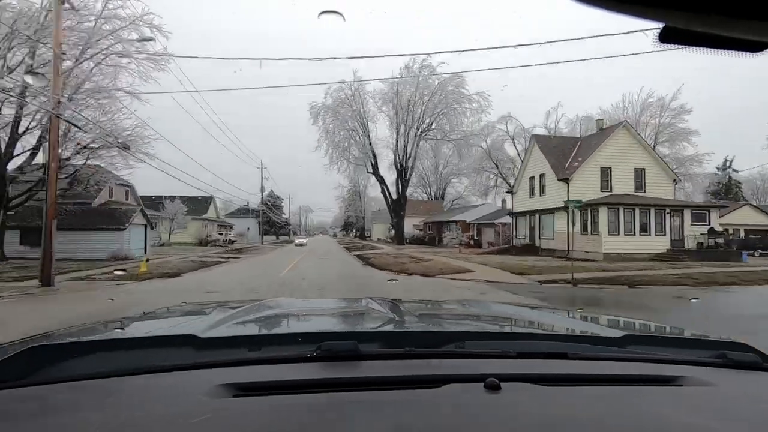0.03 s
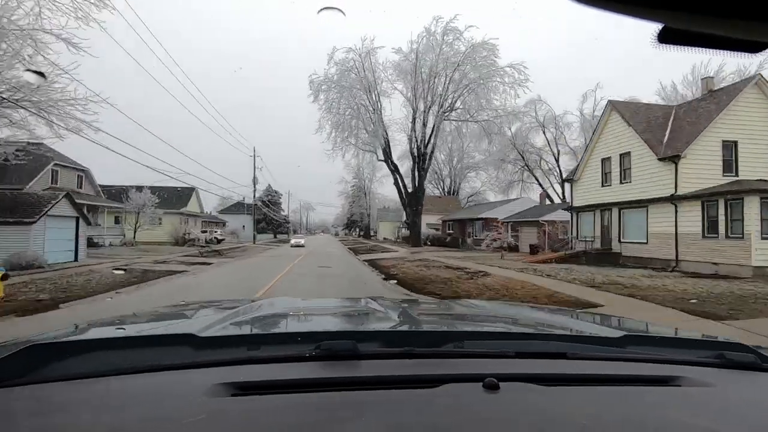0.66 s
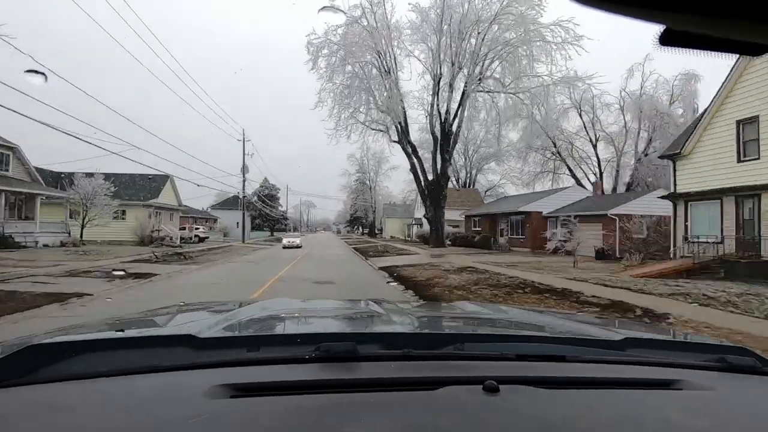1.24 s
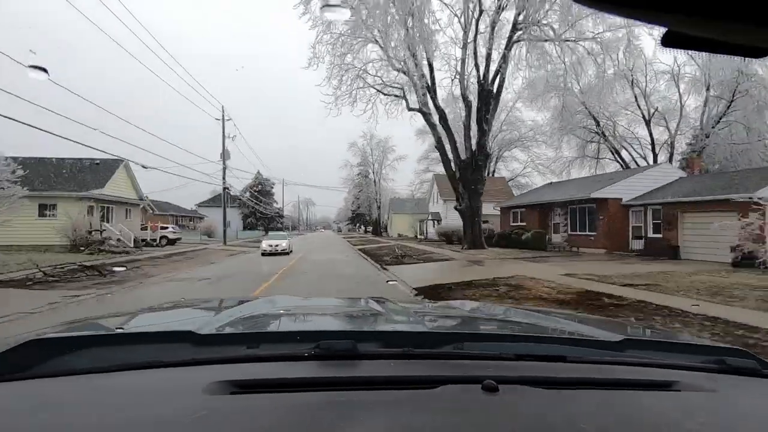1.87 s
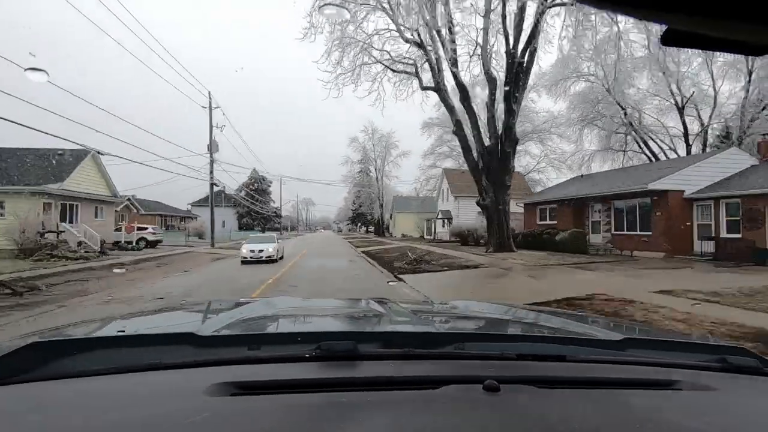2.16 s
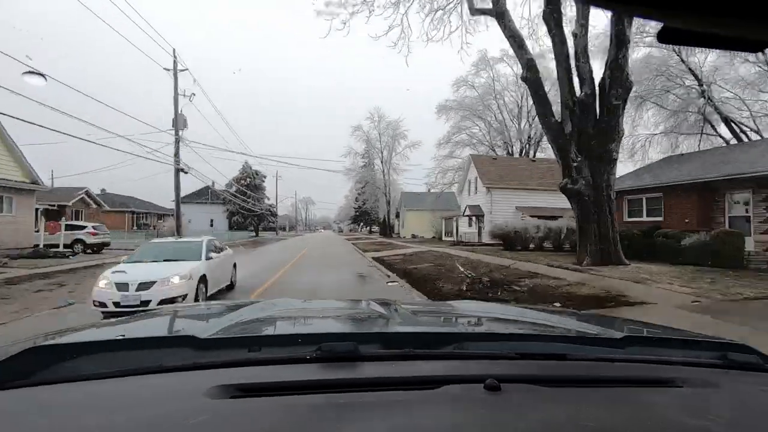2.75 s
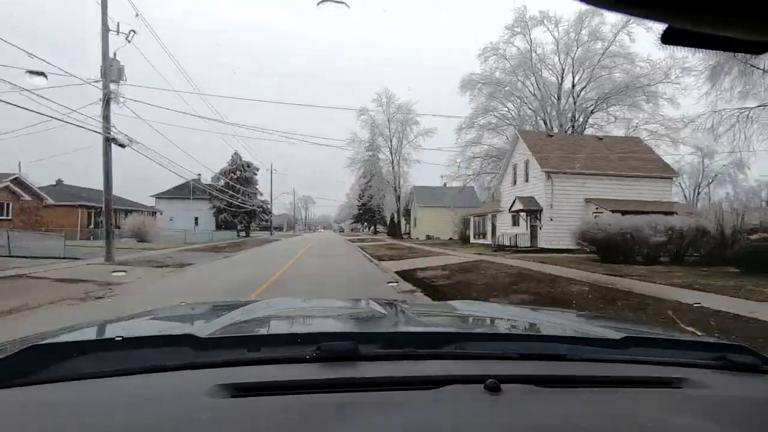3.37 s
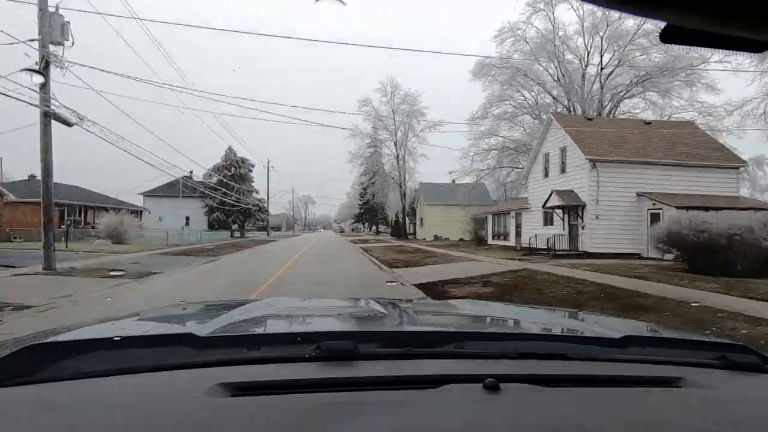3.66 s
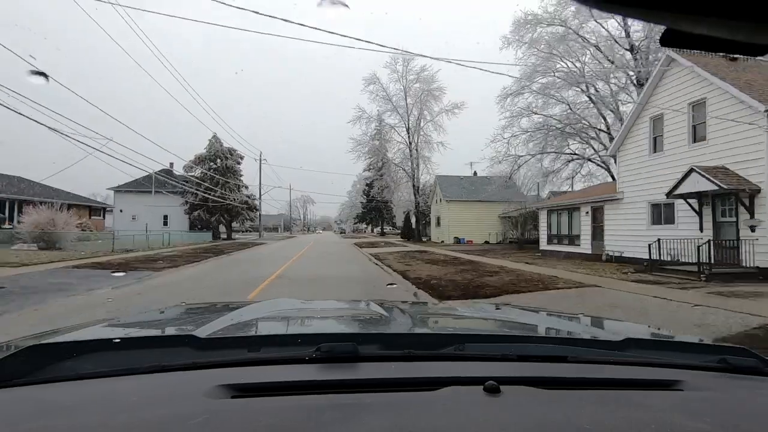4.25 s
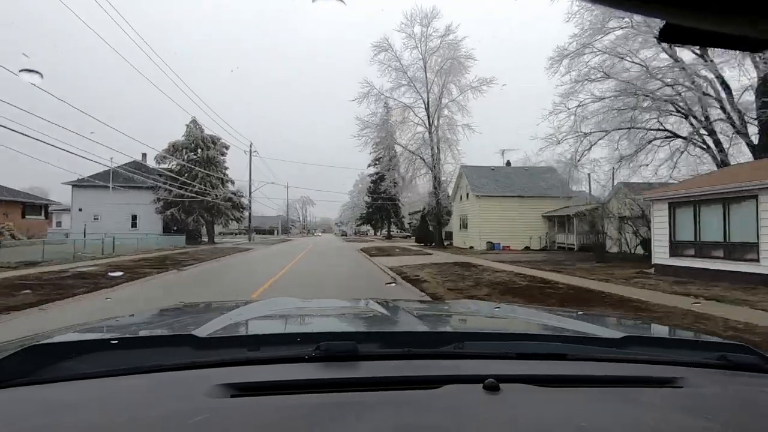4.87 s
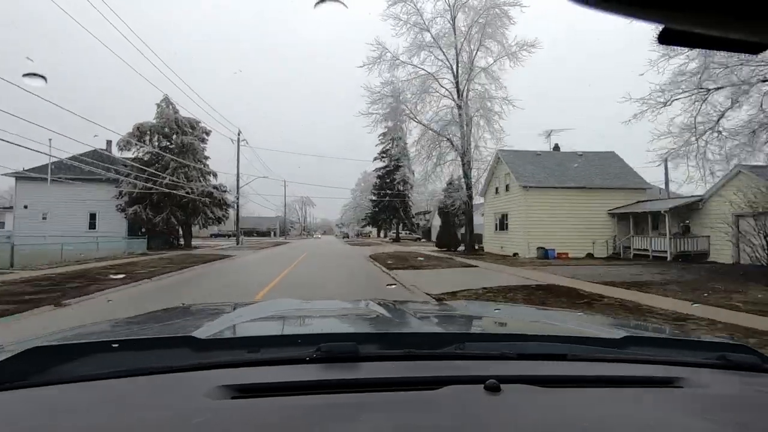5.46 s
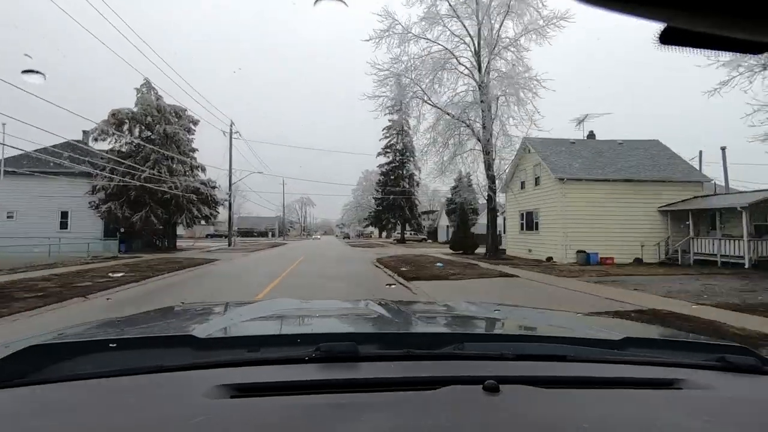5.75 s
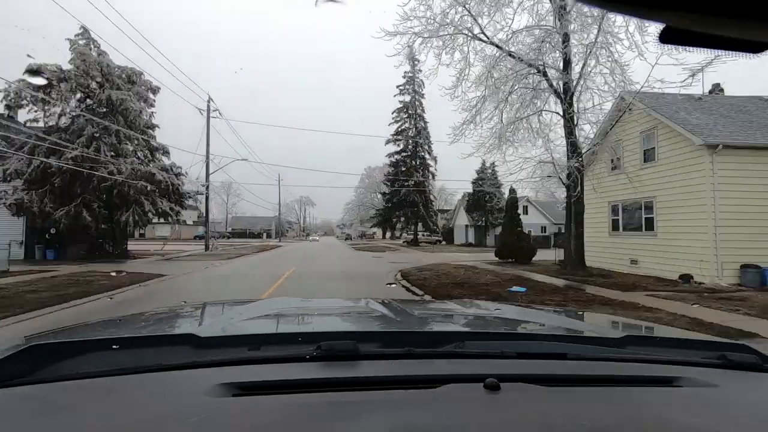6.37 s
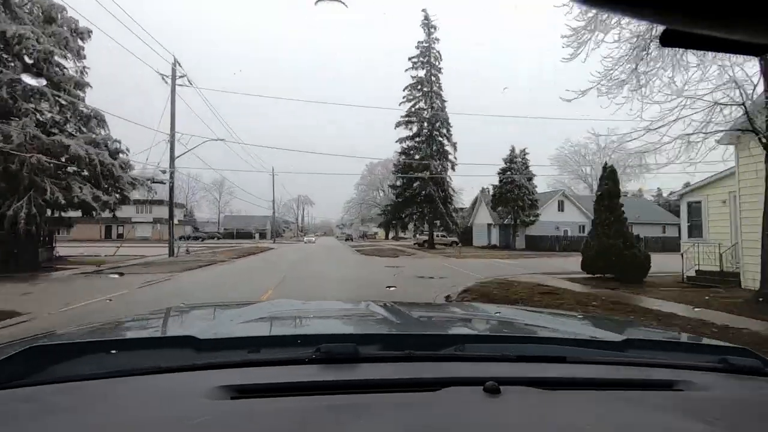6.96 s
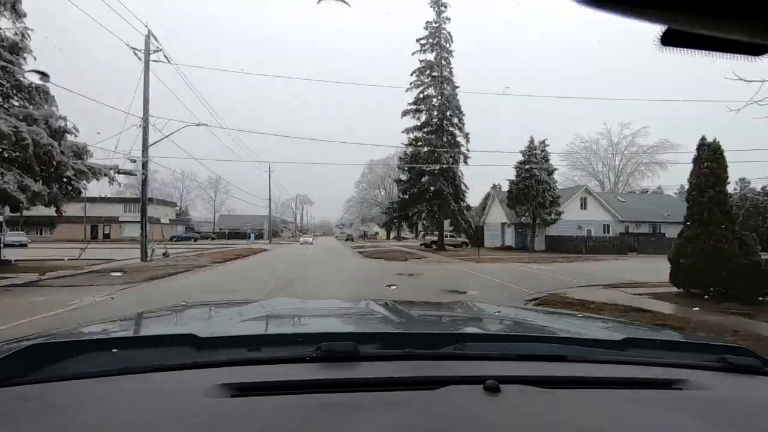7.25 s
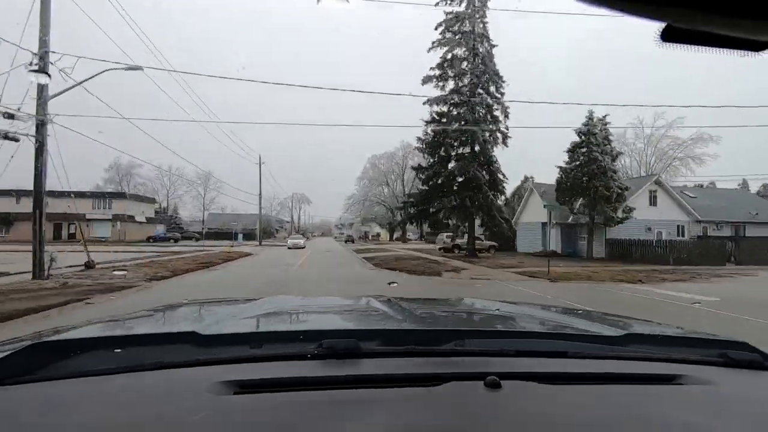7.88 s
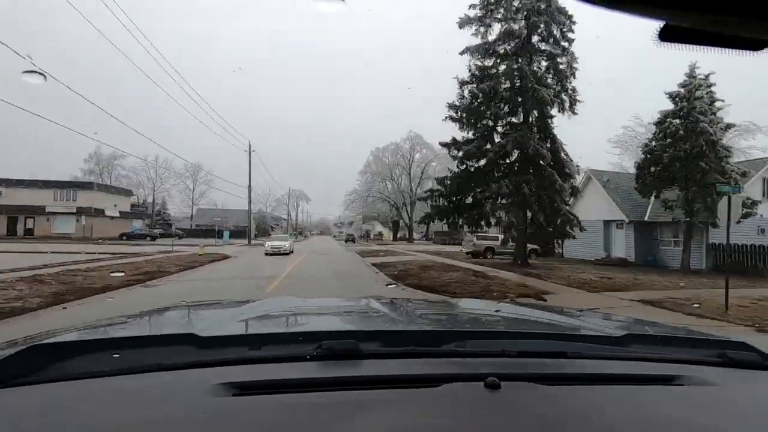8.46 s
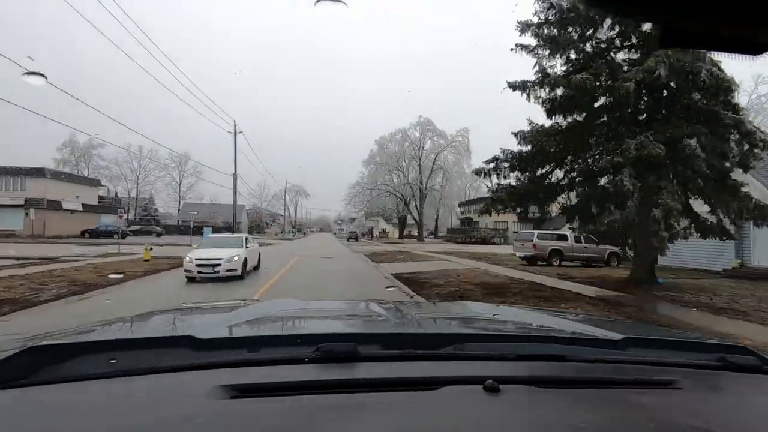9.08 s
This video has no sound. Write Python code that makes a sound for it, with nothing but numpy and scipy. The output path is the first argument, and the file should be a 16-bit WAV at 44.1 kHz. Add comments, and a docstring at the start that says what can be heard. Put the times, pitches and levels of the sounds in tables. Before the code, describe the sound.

Heard from behind the dashboard, a car rolls along a wet, uneven street. Deep booms from frequent bumps swell over steady tyre roar and a faint engine hum. Loose trim buzzes, knocks and ticks in short bursts. Three fat water drops smack the windscreen early on, something hard clatters briefly near the middle, and a few more drops land later, around the heaviest bump and its run of rattles.

```python
"""Inside a car rolling along a wet, uneven street after an ice storm.
Bumps set the cabin air booming and drum the floor pan, over tyre roar and a low engine hum.
Loose trim buzzes and knocks, a camera mount knocks in its play, small fittings tick, a plastic
joint squeaks and something hard clatters briefly. Fat drops of meltwater smack the windscreen
and excite the bending modes of the glass."""
import sys
import numpy as np
from scipy import signal
from scipy.fft import rfft, irfft
from scipy.io import wavfile
from scipy.ndimage import uniform_filter1d, minimum_filter1d

SR = 44100
rng = np.random.default_rng(int(sys.argv[2]) if len(sys.argv) > 2 else 0)


def wav_record(signal):
    """Record a signal, one row per channel, as 16-bit PCM in the file named by sys.argv[1]."""
    frames = np.transpose(np.atleast_2d(signal))
    bounded = np.clip(frames, -1, 1)
    # unit amplitude maps onto the largest positive 16-bit level
    quanta = np.round(bounded * 32767).astype(np.int16)
    wavfile.write(sys.argv[1], SR, quanta)


N = 402191
TIME = np.arange(N) / SR
IMPACT_TIME = np.arange(8192) / SR


def gain_of(db):
    """Amplitude ratio of a level; the levels in all tables are relative."""
    return 10 ** (np.asarray(db) / 20)


def unit_rms(x):
    """Normalisation to unit mean power."""
    return x / np.sqrt(np.mean(x ** 2) + 1e-20)


def at_frequency(points, hz):
    """Interpolation on a logarithmic frequency axis."""
    f, value = np.transpose(points)
    return np.interp(np.log(hz + 1), np.log(f + 1), value)


def curves(rows):
    """Linear interpolation in time of each column of a table."""
    times, *columns = np.transpose(rows)
    return [np.interp(TIME, times, column) for column in columns]


def add(mix, start_s, sound):
    """Superposition of a stereo sound on the mix."""
    part = mix[:, max(round(start_s * SR), 0):][:, :sound.shape[-1]]
    part += sound[..., :part.shape[-1]]


def panned(lean_db):
    """Gains for a level difference of left over right."""
    return gain_of(np.array([[lean_db], [-lean_db]]) / 2)


def drift(hz):
    """Random fluctuation of rms 1, low-passed at hz."""
    f = np.fft.rfftfreq(N, 1 / SR)
    return unit_rms(irfft(rfft(rng.standard_normal(N)) / (1 + (f / hz) ** 4), N))


def minimum_phase(x, spectrum):
    """A minimum-phase filter imposes a spectrum and keeps the onset sharp."""
    size = len(IMPACT_TIME)
    log_gain = np.log(gain_of(at_frequency(spectrum, abs(np.fft.fftfreq(size, 1 / SR)))))
    response = np.exp(np.conj(signal.hilbert(log_gain)))[:size // 2 + 1]
    return irfft(rfft(x) * response, size)


def impact(spectrum, t60, crack, cabin_db, cabin_t60, coherence):
    """Impulse response: a crack, dense decaying modes and cabin reverberation; rms 1 over 4 ms."""
    t = IMPACT_TIME
    shared, *separate = rng.standard_normal((3, len(t)))
    ring = np.sqrt(coherence) * shared + np.sqrt(1 - coherence) * np.array(separate)
    ring *= gain_of(-60 * t / t60) + gain_of(cabin_db - 60 * t / cabin_t60)
    sound = minimum_phase(ring + crack * (t == 0), spectrum)
    return sound / np.sqrt(np.mean(sound[:, t < .004] ** 2))


def ringing(modes, scatter_db, detune=.01):
    """Free vibration as a sum of damped modes, whose weights vary with the point struck."""
    t, sides = IMPACT_TIME, np.array([[.5], [-.5]])
    out = np.zeros((2, len(t)))
    for hz, db, t60, lead in modes:
        decay = gain_of(db + scatter_db * rng.standard_normal() - 60 * t / t60)
        mode_hz = hz * (1 + detune * rng.uniform(-1, 1))
        out += decay * np.sin(2 * np.pi * mode_hz * t + lead * sides)
    return out


# Likeness of left and right in the cabin: f/Hz, correlation
FIELD_CORRELATION = [(30, .9), (65, .97), (95, .7), (150, .72), (170, 0), (200, .82), (245, .8), (285, .55),
                     (330, .75), (480, .72), (530, .45), (760, .35), (805, -.4), (870, .45), (1120, -.15),
                     (1400, 0), (2200, .4), (9000, .3)]
# Balance of the road noise: f/Hz, left over right/dB
FIELD_BALANCE = [(80, 0), (120, -5), (145, 0), (172, -4), (205, -1.5), (250, 1.8), (300, 2), (350, -1.2),
                 (430, 0.5), (630, 0), (940, -1), (1390, -1), (2060, -1), (3050, -0.5), (4520, -3.5),
                 (6690, -2.5), (9910, -0.5)]

def cabin_noise(spectrum, patchy_db, size=2048):
    """A partly coherent noise field of rms 1, nearly mono in the bass, with drifting spectral patches."""
    hz, hop = np.fft.rfftfreq(size, 1 / SR), size // 4
    a, b, c, d, patches = rng.standard_normal((5, len(hz), N // hop + 5))
    patches = uniform_filter1d(patches, size=14, axis=0)
    patches = unit_rms(uniform_filter1d(patches, size=6, axis=1))
    correlation = at_frequency(FIELD_CORRELATION, hz)[:, None]
    left = a + 1j * b
    right = correlation * left + np.sqrt(1 - correlation ** 2) * (c + 1j * d)
    field = np.array([left, right]) * gain_of(at_frequency(spectrum, hz)[:, None] + patchy_db * patches)
    field *= gain_of(np.outer([.5, -.5], at_frequency(FIELD_BALANCE, hz)))[..., None]
    _, sound = signal.istft(field, nperseg=size, noverlap=size - hop)
    return unit_rms(sound[:, :N])


# Engine under light load: t/s, firing rate f/Hz, level/dB
ENGINE_RUN = [(0, 72.56, 1.5), (1.2, 73.7, 2.5), (1.65, 80.14, -3.5), (2.1, 75.45, 8), (4.5, 76.1, -8),
              (6.5, 73.57, 1.5), (7.6, 78, 0.5), (8.3, 74, -2), (9.12, 72.6, 0)]
# Orders of the hum: multiple of the firing rate, level/dB
HUM_ORDERS = [(1, -42), (2, -53.5), (2.5, -56)]

def engine(waver_db=4.0, rough_db=3.5, rough_hz=18):
    """Periodic firing gives a few orders; uneven firing modulates their amplitude and phase."""
    firing_hz, hum_db = curves(ENGINE_RUN)
    cycles = np.cumsum(firing_hz * (1 + 0.0049 * drift(hz=2.7))) / SR
    hum = np.zeros(N)
    for order, db in HUM_ORDERS:
        amplitude = gain_of(db + hum_db + waver_db * drift(hz=1.0) + rough_db * drift(rough_hz))
        hum += amplitude * np.sin(2 * np.pi * order * cycles + .25 * order * drift(rough_hz))
    return np.sqrt(2) * hum


# Road texture between bumps: t/s, rumble level/dB, roar level/dB, spray level/dB
ROAD_TEXTURE = [(.35, -39, -48, -69), (.9, -34.5, -45, -67.5), (1.65, -33.5, -45, -65.5),
                (2.5, -35, -45, -65.5), (3.05, -35, -45, -62.5), (3.65, -32.5, -46, -64),
                (3.9, -31.5, -46.5, -60), (4.25, -28.5, -44.5, -58.5), (4.42, -29, -48, -66),
                (5.0, -33.5, -48.5, -70), (5.8, -35, -48, -69), (6.8, -34, -46, -68.5),
                (7.45, -35.5, -48, -69), (7.8, -32, -48, -61.5), (8.3, -37.5, -50, -72),
                (8.65, -35, -47, -69), (9.12, -29, -45, -61)]
# Spectra of rumble, tread roar and spray: f/Hz, level/dB
RUMBLE_SPECTRUM = [(42, -24), (54, -2.5), (66, -6.5), (82, -11.5), (100, -6), (135, -10), (185, -14.5),
                   (240, -29), (400, -32), (900, -85)]
ROAR_SPECTRUM = [(120, -19), (230, 5), (285, 4.5), (330, -3), (368, 1.5), (405, -3.5), (500, -5.5),
                 (558, -5), (590, -8), (665, -2.5), (712, -6.5), (775, -4.5), (870, -7), (975, -11.5),
                 (1170, -14.5), (1360, -11.5), (1480, -18), (1620, -16.5), (1750, -20), (2300, -37),
                 (4000, -87)]
SPRAY_SPECTRUM = [(700, -15), (1500, -0.5), (2300, 2.5), (3200, -5.5), (4200, -14.5), (5500, -20.5),
                  (8200, -21), (10000, -35.5), (15000, -45.5)]

def tyres(rumble_db, roar_db):
    """Three transmission paths: rumble through the suspension, roar the floor, spray the glass."""
    *_, spray_db = curves(ROAD_TEXTURE)
    rumble = cabin_noise(RUMBLE_SPECTRUM, patchy_db=-0.5, size=4096) * gain_of(rumble_db - 0.5)
    roar = cabin_noise(ROAR_SPECTRUM, patchy_db=0.6) * gain_of(roar_db + 2)
    spray = cabin_noise(SPRAY_SPECTRUM, patchy_db=1.0) * gain_of(spray_db)
    return rumble + roar + spray


def dashboard(rumble_db, level_db=-62, rough_road_db=-24, exponent=1.24):
    """Forced vibration: fine chatter grows as a power of the rumble, saturating on rough road."""
    drive_db = exponent * np.minimum(rumble_db - rough_road_db, 0)
    spectrum = [(800, -26.0), (1400, -6.5), (2300, 0.0), (3400, -3.5),  # f/Hz, level/dB
                (4300, -11.5), (6000, -13.0), (8300, -13.5), (10000, -28.0)]
    return cabin_noise(spectrum, patchy_db=3.0, size=256) * gain_of(level_db + drive_db)


# Contact spectrum of a fitting: f/Hz, level/dB
TICK_SPECTRUM = [(800, -15.5), (1400, 3), (2400, -5.5), (3600, -8), (4500, 1), (5400, -9.5), (7000, -7.5),
                 (8300, -7.5), (9500, -10.5), (10800, -32)]
# Modes of the fittings: f/Hz, level/dB, T60/s, left phase lead/rad
FITTING_MODES = [(1280, -6.5, .02, 2), (3100, -9, .012, .3), (4400, -10, .009, .5), (4950, -3, 0.012, .5),
                 (7050, -8, .011, 1.5), (8070, 1.5, .012, 1.5)]

def tick(note_hz, note_db, note_t60=.019, rise_s=0.00094):
    """Contact between small hard parts excites their common modes and one note of their own."""
    touch = impact(TICK_SPECTRUM, t60=0.011, crack=0.92, cabin_db=-26, cabin_t60=.1, coherence=0.11)
    note = ringing([(note_hz, note_db, note_t60, 0)], scatter_db=0)
    ring = ringing(FITTING_MODES, scatter_db=2, detune=0.036)
    onset = 1 - np.exp(-IMPACT_TIME / rise_s)
    return (gain_of(-1) * touch + gain_of(-6) * ring + note) * onset * panned(lean_db=-6.5)


# Ticks of the fittings: t/s, level/dB, note f/Hz, note level/dB
FITTING_TICKS = [(0.0535, -52, 8150, -6), (0.2207, -46, 7550, -2), (0.3, -59.5, 4830, -9),
                 (0.6, -50, 7600, -2), (1.215, -49.5, 4470, -2), (1.79, -55, 7940, -7),
                 (2.083, -56, 7040, 6), (3.054, -58, 3120, 11.5), (3.5223, -57, 8200, 1),
                 (3.633, -54.5, 7000, -2), (4.263, -31, 4500, -2), (4.91, -63, 8200, -2),
                 (4.99, -59.5, 8200, -3), (5.29, -40, 3080, 1), (5.345, -51.5, 3170, 4),
                 (5.43, -41, 4530, -16), (7.033, -51, 8060, 3), (7.073, -52, 8000, 4),
                 (7.147, -59, 8060, 2), (7.185, -58, 8100, -2), (7.3, -60, 4870, -3),
                 (7.389, -57, 8140, -4), (7.805, -57, 8160, 6), (7.888, -45.5, 4400, -1),
                 (8.002, -34, 4550, -8)]
# Spectrum of a tiny hard contact: f/Hz, level/dB
FAINT_SPECTRUM = [(2000, -12.5), (4200, -15), (4950, 3), (5500, -20.5), (7200, -14.5), (8200, -2),
                  (9200, -14.5), (10500, -29.5)]

def fittings(rumble_db, tick_db=-1.5, faint_db=-70, spread_db=7, rough_road_db=-28):
    """Impact noise of small parts: distinct ticks, and faint random ones that weaken on smooth road."""
    out = np.zeros((2, N))
    for s, db, note_hz, note_db in FITTING_TICKS:
        add(out, s, gain_of(db + tick_db) * tick(note_hz, note_db))
    for when, strength in rng.random(size=(40, 2)):
        touch = impact(FAINT_SPECTRUM, t60=.012, crack=0.77, cabin_db=-24, cabin_t60=.08, coherence=0.19)
        calm_db = min(rumble_db[int(when * N)] - rough_road_db, 0)
        add(out, when * N / SR, gain_of(faint_db + spread_db * strength ** 2 + calm_db) * touch)
    return out


# Slip of a plastic joint: t/s, level/dB
JOINT_SLIPS = [(5.527, -34.5)]

def squeak(gain_db=-4, start_hz=2350, end_hz=1250, whistle_hz=3100, whistle_db=-11, length_s=0.005):
    """Frictional slip: the pitch of a joint falls as its strain is released."""
    out, t = np.zeros((2, N)), np.arange(0, length_s, 1 / SR)
    slip = np.sin(2 * np.pi * np.cumsum(np.linspace(start_hz, end_hz, len(t))) / SR)
    whistle = gain_of(whistle_db) * np.sin(2 * np.pi * whistle_hz * t)
    for s, db in JOINT_SLIPS:
        add(out, s, gain_of(db + gain_db) * (slip + whistle) * signal.windows.tukey(len(t), .5))
    return out


# Blows of hard pieces: t/s, clack level/dB, thud level/dB, note f/Hz, note over thud/dB,
# snap level/dB, left over right/dB
CLATTER_BLOWS = [(3.132, -52, -51, 900, -2, -58, -4.5), (3.763, -28.5, -46, 1050, -5, -61, -1),
                 (3.775, -32.5, -40, 800, -2, -52, -2), (3.841, -46, -51, 1100, 0, -55, -1),
                 (3.848, -41, -47, 1150, 1, -59, -1), (3.887, -54, -38.5, 514, 9, -67, 4),
                 (3.895, -48, -43, 920, -3, -75, -1), (3.906, -61, -54, 700, -2, -76, 0),
                 (3.935, -43, -43.5, 760, 4, -64, -4), (3.944, -42, -42, 480, 0, -58, 3),
                 (3.952, -25, -46, 990, -2, -46, 2), (3.962, -39.5, -43, 1040, -7, -50, -5),
                 (4.015, -30.5, -43, 800, -2, -55, -3), (4.036, -26.5, -49, 450, 0, -39, 0),
                 (4.048, -52, -51, 860, -2, -49, -3), (4.154, -42, -49.5, 1010, 7, -58.5, -2),
                 (4.295, -47, -51, 900, -7, -59, -3)]
# Spectra of the three parts of a blow: f/Hz, level/dB
THUD_SPECTRUM = [(200, -5.5), (450, 9), (850, 3.5), (1200, 1.5), (1900, -2.5), (3500, -27), (8000, -40)]
CLACK_SPECTRUM = [(400, -28), (900, 1.5), (1400, -4), (1900, 1.5), (2300, 3.5), (2750, 3), (3400, 1),
                  (4400, -10.5), (6000, -23), (10000, -36)]
SNAP_SPECTRUM = [(2000, -35.5), (4200, 2.5), (6000, -1.5), (7800, 0.5), (8800, -5), (9600, -9),
                 (10800, -36)]

def clatter(thud_gain_db=6.0, clack_gain_db=-4, snap_gain_db=4.5, note_t60=0.017):
    """Impact and rebound of hard pieces: a hollow thud with a woody note, a clack and a bright snap."""
    out = np.zeros((2, N))
    for s, clack_db, thud_db, note_hz, note_db, snap_db, lean_db in CLATTER_BLOWS:
        note = ringing([(note_hz, note_db, note_t60, 0)], scatter_db=0)
        thud = impact(THUD_SPECTRUM, t60=.066, crack=1.7, cabin_db=-9, cabin_t60=.15, coherence=.14)
        clack = impact(CLACK_SPECTRUM, t60=.067, crack=2.8, cabin_db=-12.5, cabin_t60=.072,
                       coherence=.66)
        snap = impact(SNAP_SPECTRUM, t60=.035, crack=3, cabin_db=-12, cabin_t60=.1, coherence=.051)
        blow = (gain_of(thud_db + thud_gain_db) * (note + thud)
                + gain_of(clack_db + clack_gain_db) * clack
                + gain_of(snap_db + snap_gain_db) * snap)
        add(out, s, blow * panned(lean_db))
    return out


# Modes of the loose trim: f/Hz, level/dB, T60/s, left phase lead/rad
PANEL_MODES = [(1240, -10, .03, .8), (1650, -11, .035, .3), (2170, -7, .03, -.6), (2290, -3, .036, -.6),
               (2510, -2, .022, -.6), (2950, -4, .011, .1), (3290, -8, .016, .1), (3520, -7, .015, .1),
               (4780, -22, .03, .5)]
# Bouts of buzzing: t/s, duration/s, level/dB
BUZZ_BOUTS = [(1.087, 0.044, -46.5), (1.947, 0.12, -47.5), (2.065, 0.05, -52), (3.148, 0.042, -49),
              (3.409, 0.071, -48.5), (4.17, 0.12, -65), (4.42, 0.17, -55), (5.929, 0.129, -49),
              (6.28, 0.09, -51), (7.001, 0.097, -43), (7.611, 0.17, -48)]
# Spectrum of one buzzing contact: f/Hz, level/dB
BUZZ_SPECTRUM = [(250, -1.5), (500, 10), (1000, -4), (1270, -1), (1650, 7.5), (1950, -5.5), (2250, -2.5),
                 (3200, -4), (4200, -13), (6000, -14.5), (8400, -19), (10000, -34.5)]

def trim_buzz(gain_db=-3, spots=4, contacts_per_s=900, spread_db=2.5, edge_s=0.0093, ring_db=-2):
    """Contact chatter: Poisson trains of tiny impacts excite the shaken trim at several spots."""
    chatter = np.zeros((2, N))
    for chance, size in rng.random(size=(spots, 2, N)):
        strength = gain_of(spread_db * np.minimum(-np.log(1 - size), 3))
        contacts = (chance < contacts_per_s / spots / SR) * strength
        touch = impact(BUZZ_SPECTRUM, t60=0.02, crack=2.2, cabin_db=-10.5, cabin_t60=0.18, coherence=.3)
        ring = gain_of(ring_db) * ringing(PANEL_MODES, scatter_db=1.2, detune=0.004)
        chatter += signal.oaconvolve(contacts[None], touch + ring, axes=1)[:, :N]
    bouts = sum(gain_of(db) * np.clip(np.minimum(TIME - s, s + length - TIME) / edge_s, 0, 1)
                for s, length, db in BUZZ_BOUTS)
    return unit_rms(chatter) * bouts * gain_of(gain_db) * panned(lean_db=-1)


# Knocks of a trim panel: t/s, level/dB
PANEL_KNOCKS = [(1.0932, -43), (1.113, -35), (1.9567, -35.5), (1.9805, -31.5), (2.004, -32), (2.0261, -34),
                (2.046, -44), (2.069, -30.5), (2.0931, -38), (2.392, -49), (2.859, -46), (3.1601, -35),
                (3.4193, -39), (3.452, -33.5), (3.6925, -38.5), (4.1955, -38.5), (4.241, -39), (4.322, -36),
                (4.435, -35.5), (4.487, -44), (4.5364, -38.5), (4.5585, -40), (4.7032, -46.5),
                (5.3642, -39.5), (5.966, -33.5), (6.0136, -34), (6.041, -42.5), (6.2813, -40),
                (6.3141, -35.5), (6.337, -41), (6.3619, -41), (7.0138, -28.5), (7.0375, -29), (7.0604, -29),
                (7.0867, -29.5), (7.1656, -44.5), (7.21, -50.5), (7.5795, -43.5), (7.6297, -38),
                (7.657, -33), (7.703, -38), (7.74, -34), (7.785, -36), (9.091, -40.5)]
# Spectrum of one knock: f/Hz, level/dB
PANEL_SPECTRUM = [(200, 0), (400, 16.5), (1000, -2), (1350, -0.5), (1900, -8), (2250, 0.5), (2800, -1.5),
                  (3500, -13), (4300, -26.5), (6000, -22), (8400, -24.5), (10000, -39)]

def trim_knocks(gain_db=-0.5, ring_db=-2, rise_s=.0006):
    """Impulsive excitation: a loose panel strikes its seat and rings in its modes."""
    out = np.zeros((2, N))
    onset = 1 - np.exp(-(IMPACT_TIME / rise_s) ** 2)
    for s, db in PANEL_KNOCKS:
        knock = impact(PANEL_SPECTRUM, t60=.0046, crack=.35, cabin_db=-19, cabin_t60=.13, coherence=.19)
        ring = gain_of(ring_db) * ringing(PANEL_MODES, scatter_db=1.2, detune=0.004)
        add(out, s, gain_of(db + gain_db) * (knock + ring) * onset)
    return out * panned(lean_db=4.5)


# Knocks of the camera mount: t/s, level/dB
MOUNT_JOLTS = [(1.003, -39), (1.090, -45), (1.111, -34), (1.137, -40), (2.698, -46), (2.773, -45),
               (2.841, -49), (3.157, -40), (3.218, -36.5), (3.240, -47), (3.522, -45), (3.650, -42),
               (4.230, -45), (4.255, -32), (4.261, -34), (4.279, -34), (4.457, -42), (4.476, -37),
               (4.499, -34), (4.566, -44), (5.289, -40), (5.348, -38), (5.418, -35), (5.590, -45),
               (5.988, -40), (7.005, -38), (7.028, -32), (7.048, -32), (7.072, -37), (7.122, -41),
               (7.143, -33), (7.164, -40), (7.182, -41), (7.735, -38), (7.757, -31), (7.778, -34),
               (7.803, -26), (7.917, -39), (8.003, -34), (8.026, -37), (8.904, -40), (9.100, -39)]
# Its modes, shaking left and right in opposite senses: f/Hz, level/dB, T60/s, left phase lead/rad
MOUNT_RESONANCES = [(370, -3.5, .025, 1.9), (610, -9, .018, 2.5), (790, -9, .022, 4.1),
                    (1320, 1.5, .045, 3), (2250, -28.5, .02, 3)]

def camera_mount(gain_db=1, rise_s=.0007):
    """Structure-borne sound: a mount rocking in its play gives runs of dull, pitched knocks."""
    out = np.zeros((2, N))
    onset = 1 - np.exp(-(IMPACT_TIME / rise_s) ** 2)
    for s, db in MOUNT_JOLTS:
        add(out, s, gain_of(db + gain_db) * ringing(MOUNT_RESONANCES, scatter_db=1, detune=.015) * onset)
    return out


# Meltwater drops: t/s, blow level/dB, splash level/dB
MELTWATER_DROPS = [(0.179, -31, -45), (0.568, -30.5, -48.5), (1.002, -29, -42), (5.722, -36.5, -57.5),
                   (6.662, -31, -53), (7.108, -41, -63), (8.902, -30, -47.5)]
# Bending modes of the windscreen: f/Hz, level/dB, T60/s, left phase lead/rad
WINDSCREEN_MODES = [(475, 5.5, 0.05, 0.85), (531, 6.5, 0.044, .83), (695, -9, .028, 0.5),
                    (1190, -18.5, 0.052, 5), (1310, -15.5, .044, 1), (1350, -7, 0.062, -1),
                    (1447, -3.5, 0.052, 2.1), (1620, -13.5, 0.028, -8), (1740, -15.5, 0.044, -0.5),
                    (2180, -17, 0.072, 0), (2664, -21, .05, -0.5), (3300, -24, 0.043, 3.5),
                    (4400, -35, 0.069, 1.5), (5050, -35.5, 0.068, 4)]
# Spectra of a drop's smack and splash: f/Hz, level/dB
SMACK_SPECTRUM = [(300, -12.5), (600, -6), (1000, -1), (1400, 1), (2700, -0.5), (3800, -12.5),
                  (5500, -16.5), (10000, -75)]
SPLASH_SPECTRUM = [(2000, -30.5), (4000, -10), (6000, 2.5), (8400, 8), (9400, -1), (10500, -15.5),
                   (12000, -28)]

def drops(thump_db=3.5, smack_db=-8, bend_s=0.0021, lag_s=0.0011):
    """Impact on a plate: the splash ticks at once; the slower bending waves swell just after it."""
    out = np.zeros((2, N))
    swell = 1 - np.exp(-(IMPACT_TIME / bend_s) ** 2)
    for s, db, splash_db in MELTWATER_DROPS:
        thump = ringing(WINDSCREEN_MODES, scatter_db=1, detune=.015) * swell * panned(lean_db=5)
        smack = impact(SMACK_SPECTRUM, t60=.052, crack=3.4, cabin_db=-19.5, cabin_t60=.24, coherence=.67)
        splash = impact(SPLASH_SPECTRUM, t60=.0093, crack=1.8, cabin_db=-10.5, cabin_t60=.17,
                        coherence=.1)
        add(out, s, gain_of(splash_db) * splash * panned(lean_db=-3))
        add(out, s + lag_s, gain_of(db + thump_db) * thump + gain_of(db + smack_db) * smack)
    return out


def bump_envelope(start_s, length_s, attack_s, release_s):
    """First-order response: exponential growth during a bump and decay after it."""
    t = np.maximum(TIME - start_s, 0)
    return (1 - np.exp(-t / attack_s)) * np.exp(-np.maximum(t - length_s, 0) / release_s)


# Uneven patches of pavement: t/s, duration/s, boom level/dB, rumble level/dB, tyre slap level/dB
PAVEMENT_BUMPS = [(0.065, 0.17, -16, -34, -51.5), (0.917, .22, -19, -25.5, -49.5),
                  (1.05, 0.056, -20, -26, -41.5), (1.163, 0.093, -27, -26, -54),
                  (1.342, 0.1, -21, -29, -68), (1.906, 0.18, -15, -25.5, -42.5),
                  (2.242, 0.083, -20.5, -24.5, -52), (2.35, 0.058, -15.5, -26, -57),
                  (2.59, 0.041, -19, -43, -63), (2.739, 0.15, -20.5, -27.5, -51),
                  (3.013, 0.21, -18, -25.5, -49), (3.306, 0.14, -17, -32.5, -52.5),
                  (3.514, 0.17, -25, -40, -59), (3.633, 0.093, -15.5, -26.5, -48.5),
                  (3.82, 0.018, -13, -42, -54), (4.177, 0.1, -15.5, -35, -58),
                  (4.396, 0.13, -14.5, -30.5, -46.5), (4.724, 0.077, -13.5, -37, -68),
                  (5.032, 0.032, -15.5, -49, -57), (5.279, 0.19, -20.5, -26.5, -48),
                  (5.514, 0.21, -19, -32.5, -52.5), (5.894, 0.14, -14.5, -30, -45),
                  (6.185, 0.097, -18.5, -30.5, -52.5), (6.279, 0.1, -18.5, -28, -47),
                  (6.55, 0.16, -23.5, -36, -54.5), (6.787, 0.071, -19, -35, -53),
                  (6.993, 0.1, -9.5, -21, -35.5), (7.168, 0.045, -16, -43, -60),
                  (7.32, 0.094, -15, -32.5, -53), (7.56, 0.19, -11.5, -28.5, -47.5),
                  (7.757, 0.056, -18, -25, -46), (7.908, 0.098, -12.5, -31.5, -57),
                  (8.775, 0.16, -22, -30.5, -61), (8.93, 0.036, -25, -31.5, -52),
                  (9.012, 0.075, -24, -33.5, -45.5)]

def road_levels(calm_boom_db=-33):
    """Incoherent sources add in power: texture and bumps give the boom, rumble and roar levels in dB."""
    rumble_db, roar_db, _ = curves(ROAD_TEXTURE)
    boom, rumble, roar = gain_of(calm_boom_db) ** 2, gain_of(rumble_db) ** 2, gain_of(roar_db) ** 2
    for s, length, boom_db, bump_db, slap_db in PAVEMENT_BUMPS:
        tyre_jolt = bump_envelope(s, length, attack_s=.02, release_s=.035)
        air_swing = bump_envelope(s, length, attack_s=.05, release_s=.11)
        boom = boom + (gain_of(boom_db) * air_swing) ** 2
        rumble = rumble + (gain_of(bump_db) * tyre_jolt) ** 2
        roar = roar + (gain_of(slap_db) * tyre_jolt) ** 2
    return 10 * np.log10([boom, rumble, roar])


def floor_pan(rumble_db, gain_db=-3, thump_hz=72, wander_hz=11):
    """Panel resonance: the wheels drum the floor pan at a low, unsteady note."""
    cycles = np.cumsum(thump_hz + wander_hz * drift(hz=21.12)) / SR
    return np.sqrt(2) * gain_of(rumble_db + gain_db) * np.sin(2 * np.pi * cycles)


def cabin_boom(boom_db, rumble_db, air_hz=40.5, shudder_hz=27, uneven_db=1.0, sway=0.2):
    """Driven resonance: bumps swing the cabin air and the suspension while the body sways sideways."""
    air = np.exp(2j * np.pi * np.cumsum(air_hz + 1.77 * drift(hz=12.1)) / SR)
    springs = np.exp(2j * np.pi * np.cumsum(shudder_hz + 3.692 * drift(hz=9.63)) / SR)
    shudder_db = (boom_db + rumble_db) / 2 + uneven_db * drift(hz=2.5)
    swing = air * gain_of(boom_db) + springs * gain_of(shudder_db)
    side = swing * sway * (0.31 * drift(hz=22) + 1j * drift(hz=7.5))  # level and phase differences
    return np.sqrt(2) * np.array([swing + side, swing - side]).real * panned(lean_db=0.5)


def scene():
    """Superposition of all sources, heard from behind the dashboard."""
    boom_db, rumble_db, roar_db = road_levels()
    road = cabin_boom(boom_db, rumble_db) + floor_pan(rumble_db) + tyres(rumble_db, roar_db) + engine()
    meltwater = drops()
    rattles = trim_knocks() + camera_mount() + trim_buzz() + dashboard(rumble_db)
    small_parts = clatter() + fittings(rumble_db) + squeak()
    return road + meltwater + rattles + small_parts


def record(dry, ceiling_db=-8.4, smooth_s=.04, edge_hz=10700, top_hz=15700, shelf_db=-14):
    """Peak limiting holds down the heaviest thumps; a low-pass leaves a faint shelf of top treble."""
    size, ceiling = round(smooth_s * SR), gain_of(ceiling_db)
    allowed_gain = ceiling / np.maximum(abs(dry).max(0), ceiling)
    limited = dry * uniform_filter1d(minimum_filter1d(allowed_gain, size), size)
    padded = np.pad(limited, ((0, 0), (127, 127)), "reflect", reflect_type="odd")
    main, wide = (signal.firwin(255, hz, window=("kaiser", 7), fs=SR) for hz in (edge_hz, top_hz))
    response = main + gain_of(shelf_db) * (wide - main)
    return signal.oaconvolve(padded, response[None], "valid")


dry = scene()
out = record(dry)
wav_record(out)
```